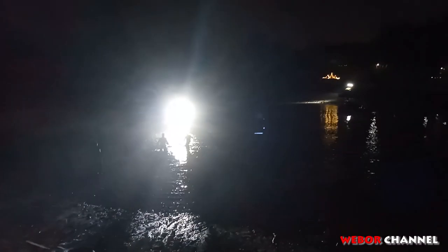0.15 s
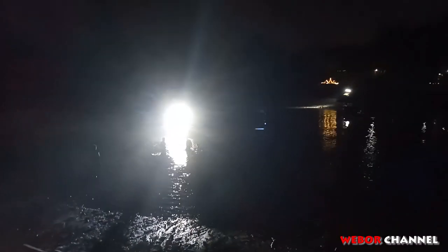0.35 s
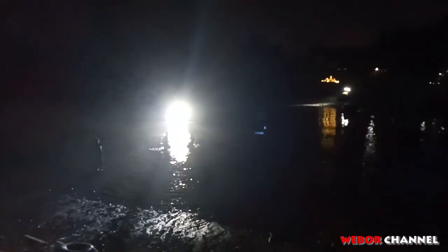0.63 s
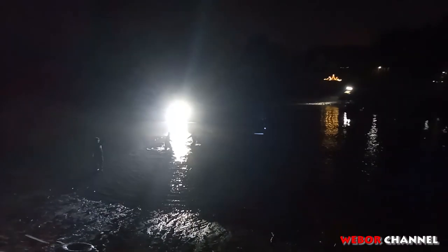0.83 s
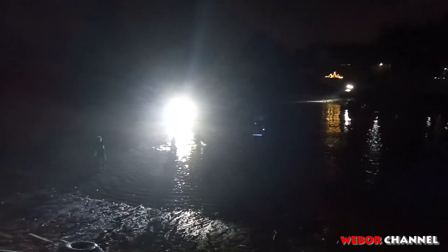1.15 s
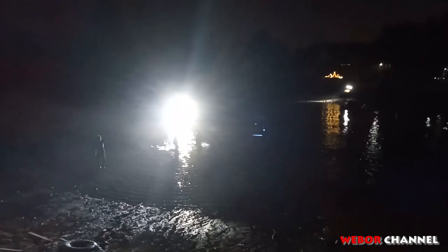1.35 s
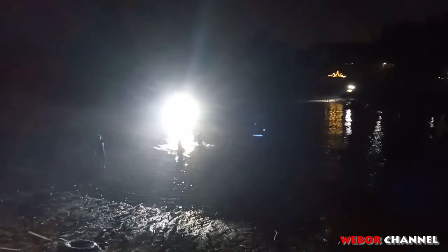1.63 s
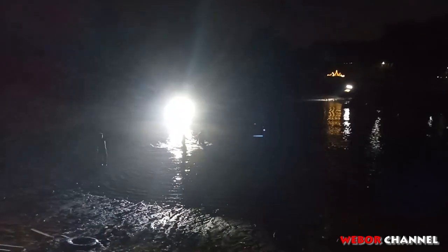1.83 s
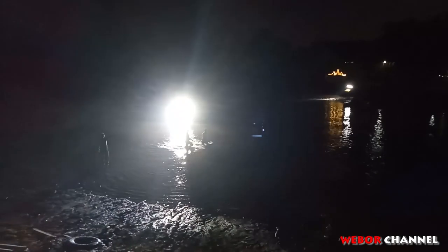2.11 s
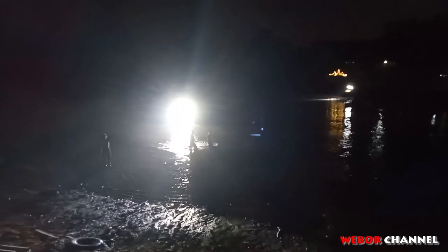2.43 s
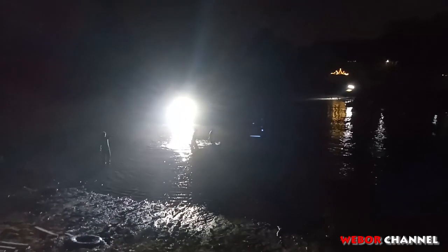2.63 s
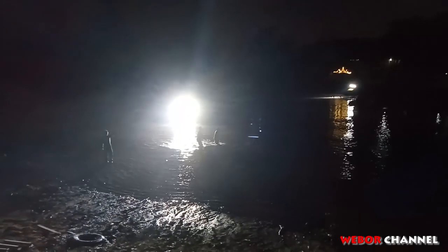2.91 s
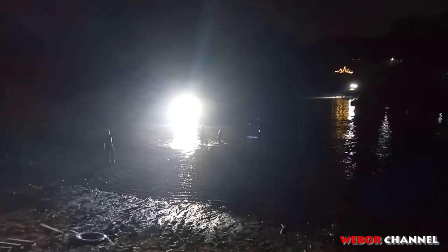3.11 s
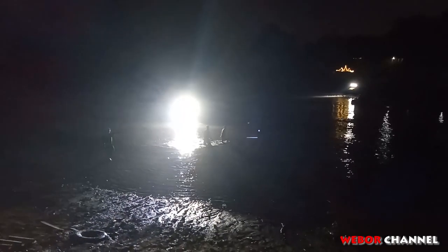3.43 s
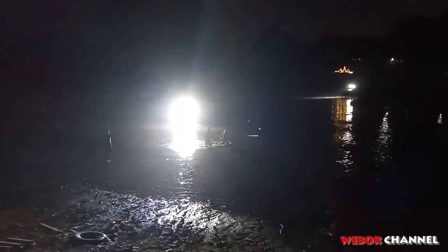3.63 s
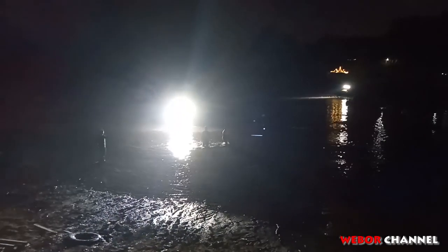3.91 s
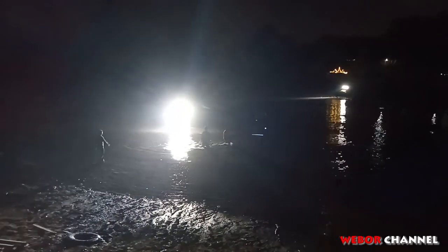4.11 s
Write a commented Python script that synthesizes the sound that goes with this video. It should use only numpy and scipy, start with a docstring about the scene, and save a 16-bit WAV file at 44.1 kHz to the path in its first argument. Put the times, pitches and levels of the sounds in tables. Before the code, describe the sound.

From a riverbank, a four-cylinder off-road vehicle is heard pushing through shallow water over a steady wash of churn and spray. The low, booming engine note rises, drops sharply with a light knock, rises again with a short growl, dips and climbs once more. Brief hollow splashes and two faint swells of drive whine come in the later part. The engine clatters throughout, growing slightly closer in the quiet night air.

```python
"""The exhaust of a four-cylinder off-road vehicle throbs through three revs as it fords a river at night.
Periodic firings drive a deep harmonic note through the pipe, and their unevenness excites a low boom
and a silencer rasp. Combustion and valve gear clatter in the engine bay; a thin drive whine swells
twice near the end. Countless drops and bubbles around the wheels sum to churn and spray. Short hollow
swells stand out: a knock, a low growl and splashes. All is heard from the bank, over faint night air."""
import sys
import numpy as np
from scipy import signal
from scipy.fft import rfft, irfft
from scipy.io import wavfile

SR = 44100
rng = np.random.default_rng(int(sys.argv[2]) if len(sys.argv) > 2 else 0)


def log_audio(samples):
    """Write samples as a 16-bit WAV file to the path given in sys.argv[1]."""
    # one column per channel
    frames = np.atleast_2d(samples).T
    # limit to full scale, then quantise
    limited = np.clip(frames, -1, 1)
    pcm = np.round(limited * 32767).astype(np.int16)
    wavfile.write(sys.argv[1], SR, pcm)


N = 188199

# Throttle presses. Each row: start and end in seconds, pedal from 0 to 1, overtone boost in dB, jolt in dB.
PRESSES = [(0.781, 0.915, 0.25, 1.5, 0), (0.925, 1.552, 0.74, 2.5, 1.5), (1.718, 1.824, 0, 7.5, 1.5),
           (2.095, 2.29, 0.95, -2.5, 1.5), (2.374, 2.556, 0.8, 2.5, 1), (2.56, 2.748, 1.0, 8, 0.8),
           (3.325, 3.673, 0.96, -0.5, 3)]
# The foot lifts. Each row: start and end in seconds, change in the note's level in dB.
LIFTS = [(1.86, 2.08, -10.5), (3.08, 3.16, -6), (3.74, 3.95, -3)]
def exhaust(cycle, firing_hz):
    """Source and filter: firings excite pipe and silencer, and the throttle shapes the result."""
    pedal, boost_db, _ = held(PRESSES, attack_s=0.033, release_s=0.05)
    lift_db, = held(LIFTS, attack_s=0.033, release_s=0.05)
    note = exhaust_note(cycle, firing_hz, pedal, boost_db, flutter_db=0.73, wander_rad=0.1)
    note *= nearness() * from_db(lift_db + throb())
    return note + boom(cycle) + rasp(cycle, boost_db)


# Pipe response. Each row: frequency in Hz, gain in dB at light throttle, gain in dB at full throttle.
PIPE_RESPONSE = [(56.3, -44.5, -42), (62.3, -48, -37.5), (68.85, -34.5, -33.5), (79, -32, -30),
                 (82.5, -29, -28), (89.23, -35, -27), (112, -36, -27.5), (138, -36, -25.5),
                 (163.8, -39.5, -28), (191.6, -47.5, -46), (253, -48.5, -40), (292, -49, -41),
                 (327, -49.5, -48.5), (360, -44.5, -46)]
def exhaust_note(cycle, firing_hz, pedal, boost_db, flutter_db, wander_rad):
    """Forced oscillation: four harmonics sweep the pipe's resonances, fluttering as water laps its end."""
    pipe_hz, light_db, full_db = np.transpose(PIPE_RESPONSE)
    out = np.zeros(N)
    for k in range(1, 5):
        light = np.interp(np.log(k * firing_hz), np.log(pipe_hz), light_db)
        full = np.interp(np.log(k * firing_hz), np.log(pipe_hz), full_db)
        db = light + pedal * (full - light) + boost_db * (k > 2)
        lag = np.pi / 4 * (k ** 2 - 1)   # dispersion: the pipe delays overtones, spreading each pulse
        phase = 2 * np.pi * k * cycle - lag + k * wander_rad * drift(20)
        out += from_db(db + np.sqrt(k) * flutter_db * drift(18)) * np.cos(phase)
    return np.sqrt(2) * out


def throb(rock_hz=9.4, lag_s=0.036, decay_s=0.5):
    """Damped oscillation: the driveline rocks after each jolt and swings the note's level, in dB."""
    t = np.arange(N) / SR
    out = np.zeros(N)
    for start, *_, jolt_db in PRESSES:
        age = np.maximum(t - start, 0)
        swing = np.minimum(age / lag_s, 1) * np.exp(-age / decay_s)
        out += jolt_db * swing * np.cos(2 * np.pi * rock_hz * (age - lag_s))
    return out


# Modes of pipe and body. Each row: frequency in Hz, bandwidth in Hz, relative level in dB.
BOOM_MODES = [(95.7, 19, 5), (123.3, 52, 3.5), (141, 54, -14)]
def boom(cycle):
    """Resonance: uneven firings excite the low modes of pipe and body."""
    return from_db(-36.0) * resonate(exhaust_pulses(cycle, uneven=2.5, gas_db=6.5), BOOM_MODES)


# Silencer modes. Each row: frequency in Hz, bandwidth in Hz, relative level in dB.
SILENCER_MODES = [(260, 51, 2.5), (292.4, 61.6, 9), (325.3, 64, 2.5), (377, 45, -11.5)]
# Rasp envelope. Each row: time in seconds, level in dB before the throttle's boost.
RASP_LEVEL = [(0, -41), (0.45, -42), (0.72, -47), (1.05, -37.5), (1.6, -38), (2.1, -43), (2.7, -39),
              (3.45, -42), (4.1, -36.5)]
def rasp(cycle, boost_db):
    """Cavity resonance: pulses of gas ring in the silencer."""
    level_db, = in_time(RASP_LEVEL)
    pulses = exhaust_pulses(cycle, uneven=1.0, gas_db=9.0)
    return from_db(level_db + 0.45 * boost_db) * resonate(pulses, SILENCER_MODES)


# Each entry: relative strength of one cylinder, in firing order.
CYLINDERS = [1.5, 0.36, 0.34, 0.44]
def exhaust_pulses(cycle, uneven, gas_db):
    """Impulsive excitation: each firing is a click of uneven strength and a puff of turbulent gas."""
    number = np.floor(cycle).astype(int)
    fired = np.diff(number, prepend=0) > 0
    strength = np.array(CYLINDERS)[number % len(CYLINDERS)] + uneven * rng.standard_normal(N)
    gas = rms_one(gated_noise(cycle, depth=0.27))
    return rms_one(fired * strength) + from_db(gas_db) * gas


# Engine bay modes. Each row: frequency in Hz, bandwidth in Hz, relative level in dB.
BAY_MODES = [(595, 87, 0.5), (753, 125, 1), (1042, 131, 0.5), (1430, 170, 1), (1791, 150, -1.5),
             (2216, 73, -5.5), (2694, 500, -10), (3026, 370, -15), (3370, 120, -16)]
# Broadband clatter. Each row: frequency in Hz, relative spectral density in dB.
CLATTER_SPECTRUM = [(400, -13.5), (600, -0.5), (900, -0.5), (1250, 1.5), (1600, -3), (2000, -5.5),
                    (3000, -5.5), (4000, -11.5), (5200, -29.5)]
def clatter(cycle, ring_db, rush_db):
    """Impact noise: combustion knock and valve gear pulse with each firing and ring in the engine bay."""
    ringing = resonate(gated_noise(cycle, depth=0.41), BAY_MODES)
    rush = coloured(gated_noise(cycle, depth=0.15), CLATTER_SPECTRUM)
    return from_db(ring_db) * ringing + from_db(rush_db) * rush


# Swells of the whine. Each row: start and end in seconds, level in dB.
WHINE_SWELLS = [(2.99, 3.07, -55), (3.958, 4.4, -47)]
# Its partials. Each row: multiple of the pitch, relative level in dB.
WHINE_PARTIALS = [(0.5, -10), (1, 0.5)]
def whine(start_hz, rise_hz_per_s, waver_hz, flutter_db):
    """Frequency and amplitude modulation: a thin tone from the drive wavers and swells twice."""
    hz = start_hz + rise_hz_per_s * np.arange(N) / SR
    gains = [(start, end, from_db(db)) for start, end, db in WHINE_SWELLS]
    swell, = held(gains, attack_s=0.065, release_s=0.065)
    turns = np.cumsum(hz + waver_hz * drift(15)) / SR
    tone = sum(from_db(db + flutter_db * drift(11)) * np.sin(2 * np.pi * k * turns)
               for k, db in WHINE_PARTIALS)
    return np.sqrt(2) * swell * tone


# Churning water. Each row: frequency in Hz, relative spectral density in dB.
CHURN_SPECTRUM = [(210, -21.5), (300, -0.5), (380, -3.5), (480, -5), (700, -4.5), (900, -12.5), (1400, -15)]
def churn(firing_hz):
    """Bubble noise: water stirred by the wheels grows louder with engine speed."""
    gain = with_speed(firing_hz, cruise_db=-43.0, db_per_octave=5.5)
    return gain * splashing(CHURN_SPECTRUM, drops_per_s=3500, size_db=3.0, surge_db=1.0)


# Spray. Each row: frequency in Hz, relative spectral density in dB.
SPRAY_SPECTRUM = [(900, -3), (1800, -2), (2500, -1.5), (3200, -1.5), (3900, -4.5), (4500, -12.5),
                  (5000, -17), (5600, -28), (6400, -28), (7000, -26), (7800, -24.5), (8700, -41.5),
                  (10000, -48), (15000, -38.5)]
# Spray envelope. Each row: time in seconds, level in dB.
SPRAY_LEVEL = [(0.03, -48), (0.87, -47.5), (1.54, -45), (2.33, -47.5), (2.69, -45), (3.22, -46.5),
               (3.54, -45.5), (4.23, -45), (4.24, -43.5)]
def spray():
    """Incoherent summation: drops thrown by the wheels merge into a hiss."""
    level_db, = in_time(SPRAY_LEVEL)
    hiss = splashing(SPRAY_SPECTRUM, drops_per_s=26000, size_db=3.0, surge_db=0.73)
    return from_db(level_db - 0.05) * hiss


def splashing(spectrum, drops_per_s, size_db, surge_db):
    """Shot noise: drops and bubbles of uneven size arrive at random and merge into a wash."""
    born = rng.random(N) < drops_per_s / SR
    sizes = rng.choice([-1, 1], N) * from_db(size_db * np.minimum(rng.exponential(1, N), 4))
    return coloured(born * sizes, spectrum) * from_db(surge_db * drift(24))


# Each row: peak time in seconds, centre and bandwidth in Hz, half length in seconds, level in dB.
HOLLOW_SWELLS = [(0.014, 960, 300, 0.0094, -39), (1.85, 720, 200, 0.0057, -40),
                 (1.85, 1170, 250, 0.015, -46.5), (2.467, 496, 200, 0.05, -39.5),
                 (3.001, 1310, 800, 0.13, -44.5), (3.359, 607, 120, 0.02, -44),
                 (3.556, 772, 200, 0.057, -46), (3.639, 1140, 300, 0.036, -43), (3.99, 767, 120, 0.04, -45)]
def hollow_swells():
    """Band-limited noise in short hollow swells: a knock, a low growl and splashes."""
    t = np.arange(N) / SR
    out = np.zeros(N)
    for peak_s, hz, width, half_s, db in HOLLOW_SWELLS:
        swell = np.exp(-.5 * ((t - peak_s) / half_s) ** 2)
        out += from_db(db) * swell * resonate(rng.standard_normal(N), [(hz, width, 0)])
    return out


# Night air. Each row: frequency in Hz, relative spectral density in dB.
AIR_SPECTRUM = [(15, -1), (35, -2.5), (52, -9), (100, 2.5), (200, -11.5), (500, -7), (2000, -28)]
def night_air():
    """Stationary noise: the air is a faint, low, steady hush."""
    return from_db(-53) * coloured(rng.standard_normal(N), AIR_SPECTRUM)


def nearness(db_per_s=0.5):
    """Spreading loss: the gain rises as the vehicle creeps towards the bank."""
    return from_db(db_per_s * (np.arange(N) - N / 2) / SR)


def with_speed(firing_hz, cruise_db, db_per_octave, cruise_hz=76):
    """Power law: the gain grows with the firing rate."""
    return from_db(cruise_db + db_per_octave * np.log2(firing_hz / cruise_hz))


def gated_noise(cycle, depth):
    """Amplitude modulation: noise swells once per firing."""
    return rng.standard_normal(N) * np.exp(depth * np.cos(2 * np.pi * cycle))


def resonate(x, modes):
    """Modal superposition: parallel resonators, each applied twice for steep skirts; rms 1."""
    out = np.zeros(N)
    for hz, width, db in modes:
        r = np.exp(-np.pi * width / SR)
        b = (1 - r * r) / 2 * np.array([1, 0, -1])
        a = [1, -2 * r * np.cos(2 * np.pi * hz / SR), r * r]
        out += from_db(db) * signal.lfilter(b, a, signal.lfilter(b, a, x + 1e-18))
    return rms_one(out)


def coloured(x, spectrum):
    """Spectral shaping, with a roll-off beyond both ends of the spectrum; rms 1."""
    hz, db = np.transpose(spectrum)
    grid = np.maximum(np.fft.rfftfreq(N, 1 / SR), 1)
    gain = from_db(np.interp(np.log(grid), np.log(hz), db))
    skirts = (1 + (hz[0] / grid) ** 4) * (1 + (grid / hz[-1]) ** 8)
    return rms_one(irfft(rfft(x) * gain / np.sqrt(skirts), N))


def drift(corner_hz):
    """Low-passed noise: a slow random fluctuation; rms 1."""
    hz = np.fft.rfftfreq(N, 1 / SR)
    return rms_one(irfft(rfft(rng.standard_normal(N)) / (1 + (hz / corner_hz) ** 2), N))


def held(rows, attack_s, release_s):
    """Trapezoidal gating: each row holds its values from start to end; one curve per value."""
    t = np.arange(N) / SR
    out = 0
    for start, end, *values in rows:
        gate = np.clip(.5 + (t - start) / attack_s, 0, 1) * np.clip(.5 + (end - t) / release_s, 0, 1)
        out = out + np.outer(values, gate)
    return out


def in_time(rows):
    """Linear interpolation of each column to every sample."""
    times, *columns = np.transpose(rows)
    return [np.interp(np.arange(N) / SR, times, column) for column in columns]


def from_db(db):
    """Decibels to amplitude gain."""
    return 10 ** (np.asarray(db) / 20)


def rms_one(x):
    """Normalisation to unit rms."""
    return x / np.sqrt(np.mean(x ** 2) + 1e-20)


# Engine speed. Each row: time in seconds, firing rate in Hz.
FIRING_RATE = [(0.0, 82), (0.09, 73.3), (0.22, 72.4), (0.81, 62.2), (0.87, 64.4), (1.07, 72.5), (1.5, 79),
               (1.79, 83.2), (1.83, 77.5), (2.04, 55.8), (2.11, 55.5), (2.35, 70.4), (2.59, 83),
               (2.79, 84.7), (2.92, 84.3), (3.02, 81.3), (3.12, 69), (3.22, 70), (3.36, 77.6), (3.56, 82.4),
               (3.91, 87.6), (4.27, 93)]
def scene():
    """Superposition: vehicle, water and night air add at the bank."""
    firing_hz, = in_time(FIRING_RATE)
    cycle = np.cumsum(firing_hz) / SR   # running count of firings
    engine = clatter(cycle, ring_db=-1, rush_db=-4.5)
    engine *= with_speed(firing_hz, cruise_db=-43.0, db_per_octave=3)
    approaching = nearness() * (engine + churn(firing_hz))
    background = spray() + night_air()
    vehicle = exhaust(cycle, firing_hz) + approaching
    drive = whine(start_hz=1392, rise_hz_per_s=7.5, waver_hz=3.2, flutter_db=2.0)
    return (vehicle + drive + hollow_swells() + background)[None]


def record(dry, stopband_hz=16200):
    """Low-pass filtering: the highest treble is cut steeply."""
    return signal.sosfilt(signal.cheby2(12, 70, stopband_hz, fs=SR, output="sos"), dry)


dry = scene()
out = record(dry)
log_audio(out)
```